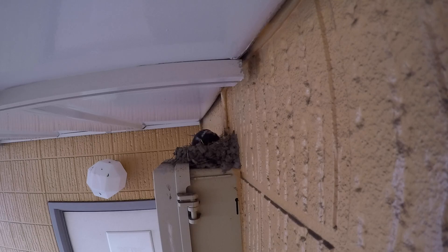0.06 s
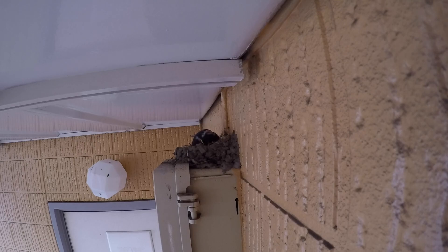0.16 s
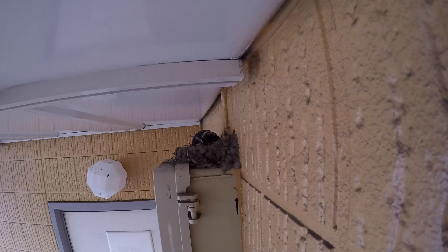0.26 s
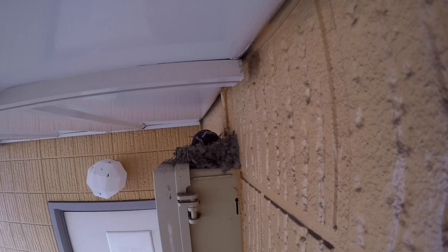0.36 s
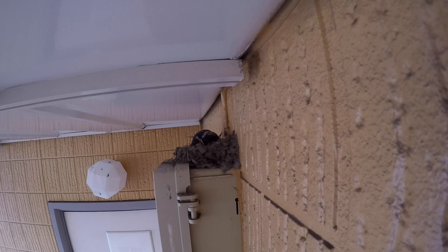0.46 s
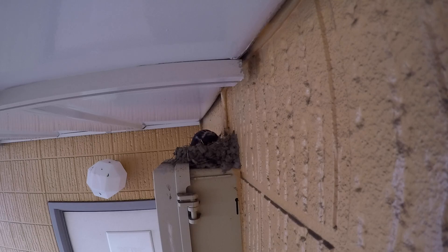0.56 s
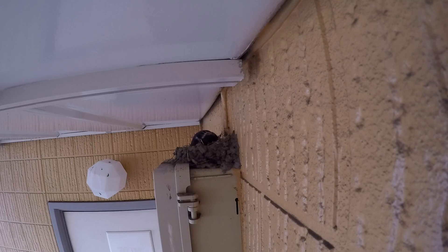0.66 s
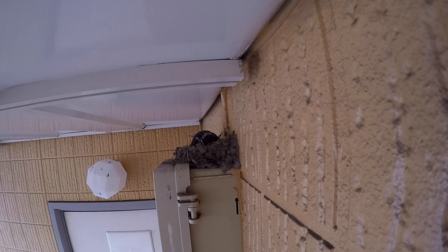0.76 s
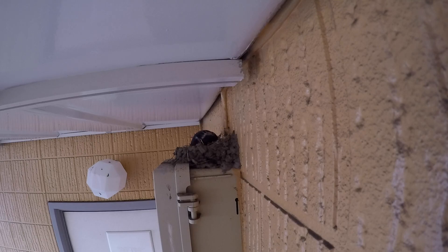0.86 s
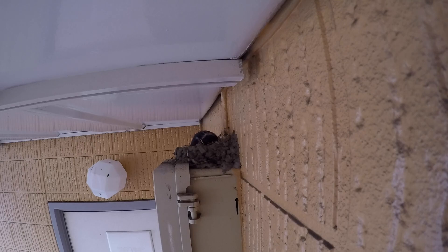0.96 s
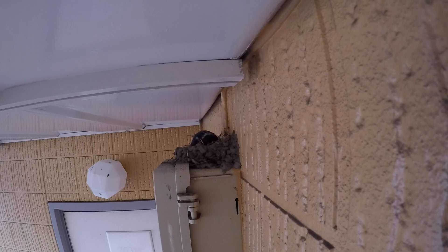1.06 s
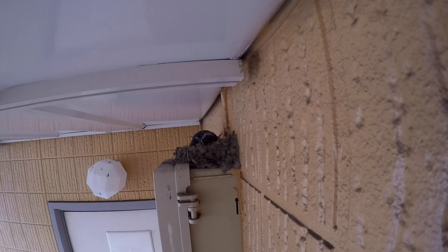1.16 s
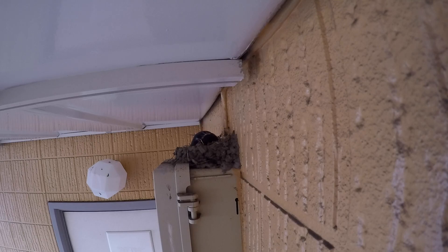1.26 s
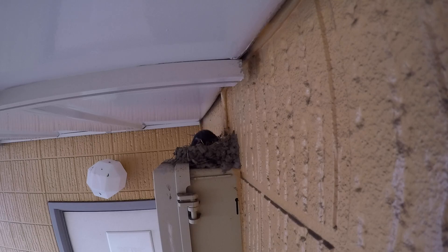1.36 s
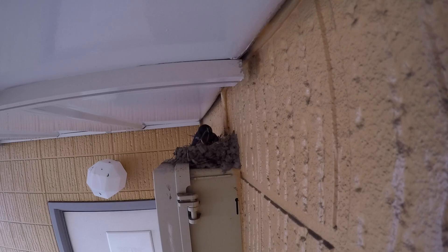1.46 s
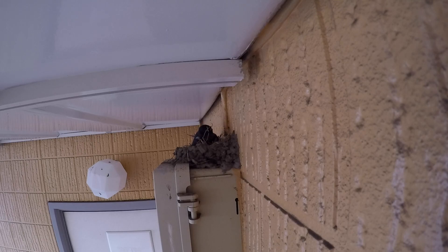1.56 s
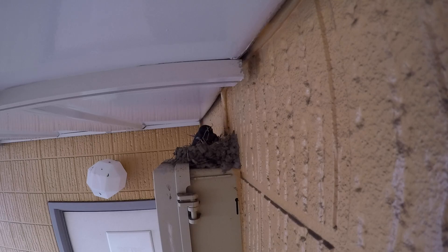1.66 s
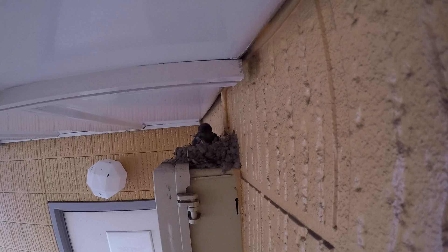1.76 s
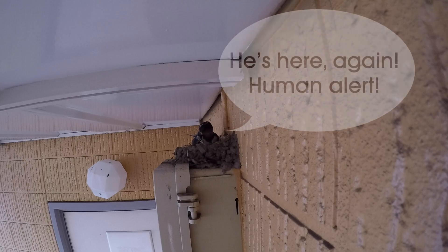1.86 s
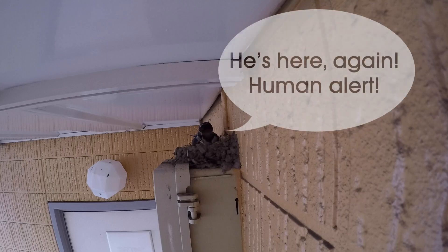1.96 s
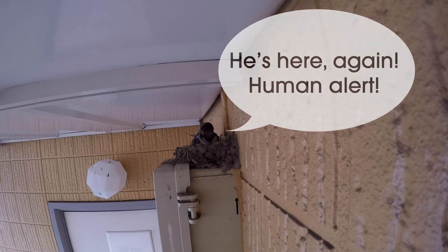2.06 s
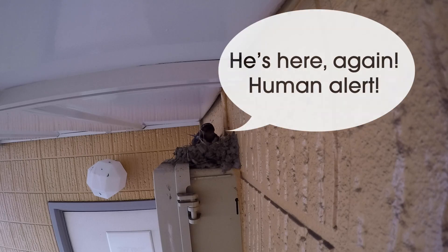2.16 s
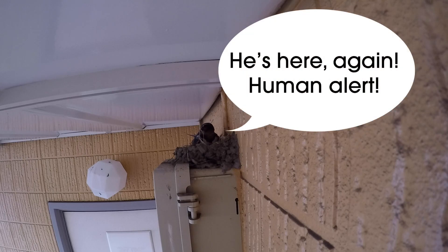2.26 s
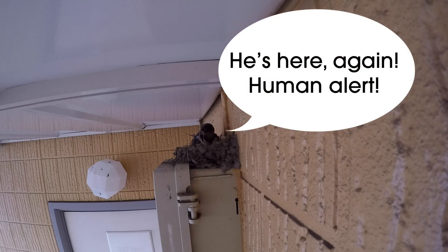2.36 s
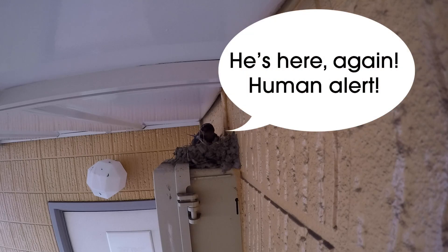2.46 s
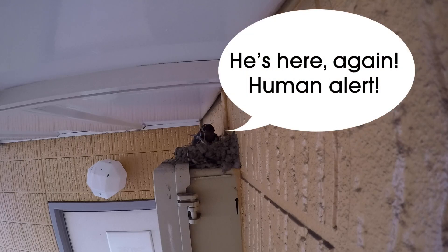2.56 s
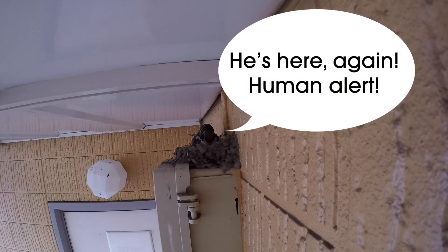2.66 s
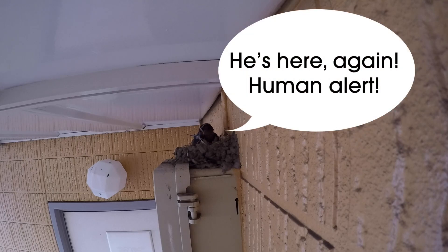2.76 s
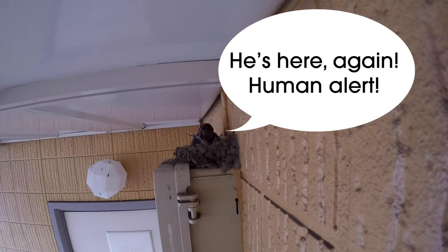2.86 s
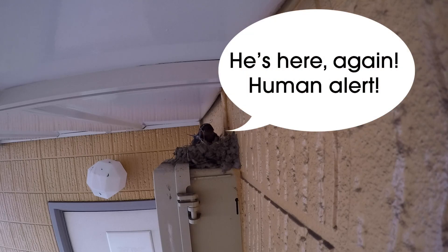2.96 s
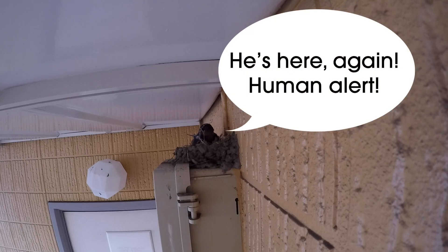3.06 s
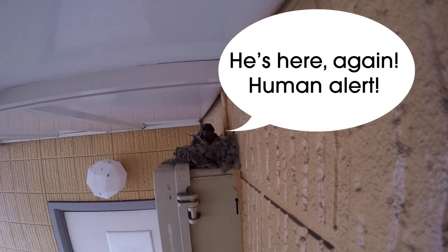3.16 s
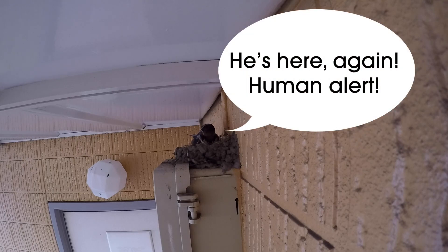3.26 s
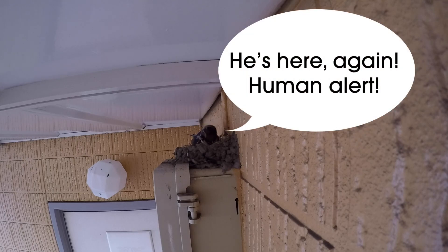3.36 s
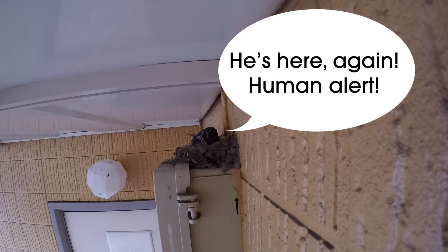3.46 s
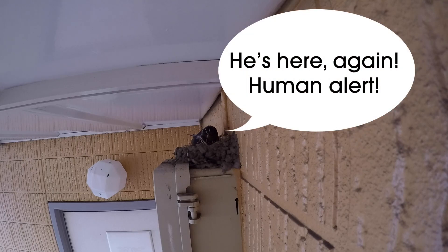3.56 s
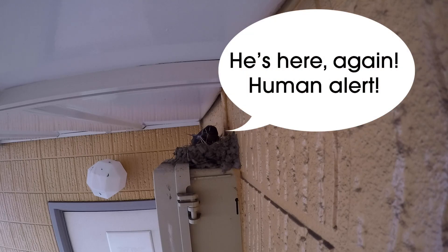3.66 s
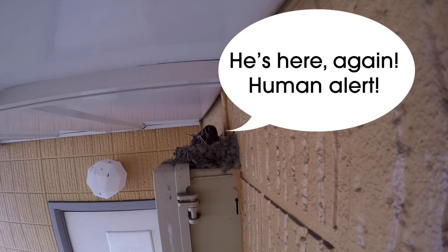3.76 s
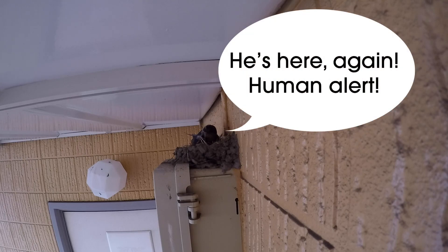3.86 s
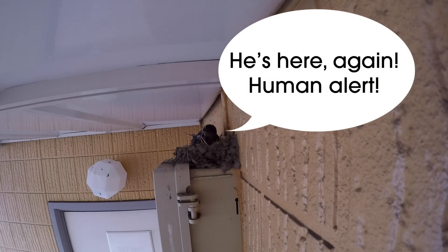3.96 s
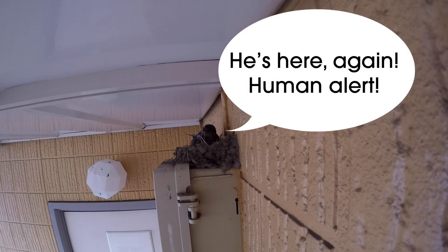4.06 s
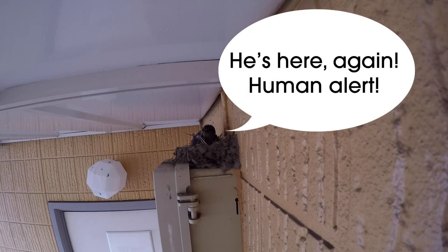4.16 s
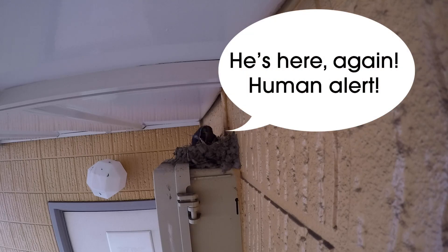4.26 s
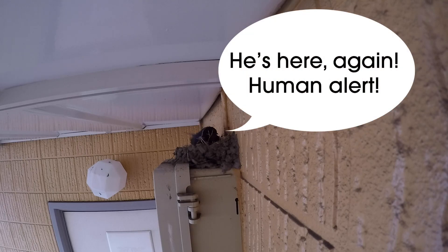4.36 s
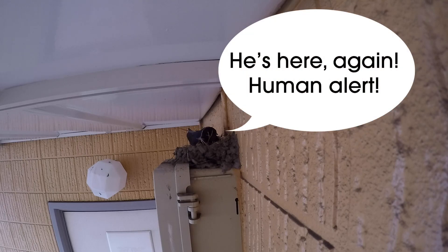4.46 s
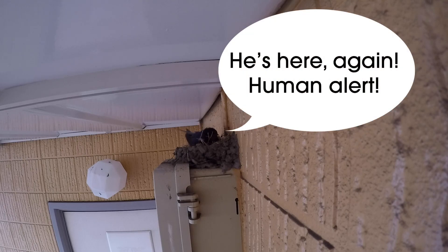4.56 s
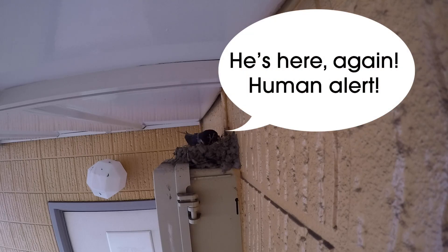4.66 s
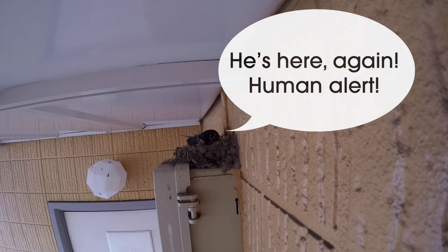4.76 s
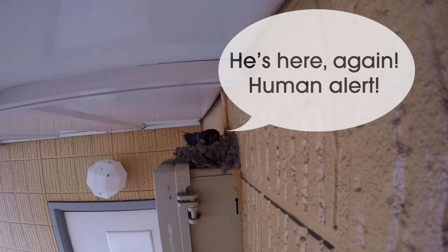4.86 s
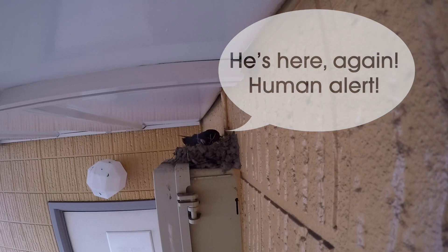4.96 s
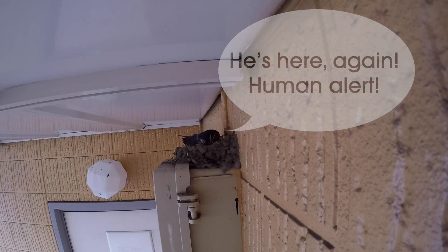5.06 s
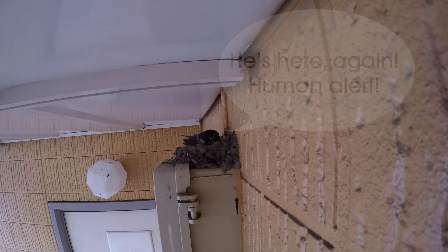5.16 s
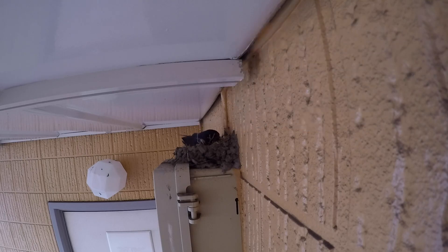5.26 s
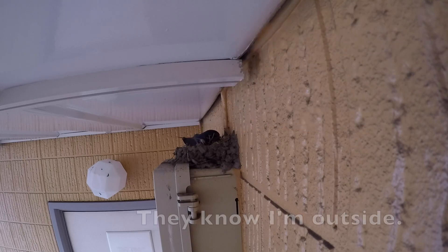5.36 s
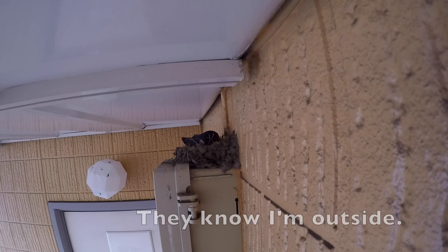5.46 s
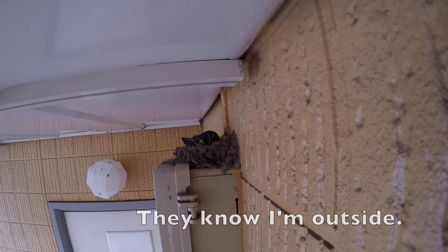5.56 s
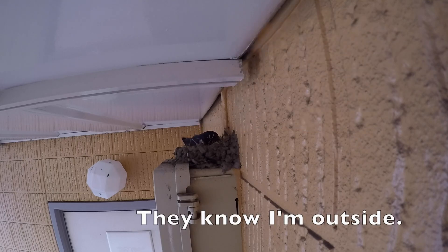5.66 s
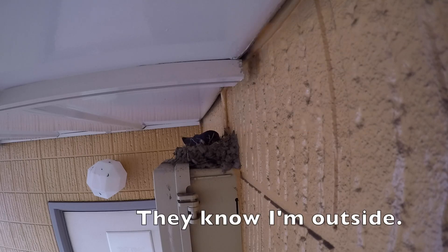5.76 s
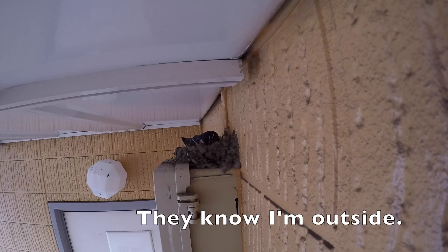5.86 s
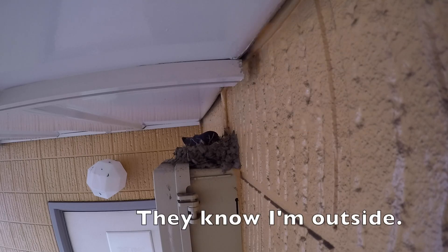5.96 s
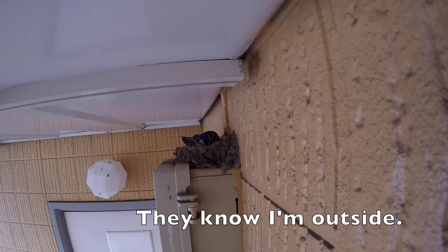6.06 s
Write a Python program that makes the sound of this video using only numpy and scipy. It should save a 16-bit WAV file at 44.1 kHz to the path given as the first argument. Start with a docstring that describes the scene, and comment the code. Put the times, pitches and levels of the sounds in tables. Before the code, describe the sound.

A swallow scolds from its porch nest with three rising chirps, then three quick phrases of tick, whistle, rasp and squeal over faint outdoor hush.

```python
"""Under a porch roof a barn swallow scolds from its nest: three rising chirps, then three phrases of
tick, whistle, rasp and two-voiced squeal, with two small beak clicks. The two sides of its syrinx are
phase oscillators that sound alone or modulate each other; one throat filter shapes every note.
The porch answers with brief echoes. Behind lie steady air, a low rumble, a distant rush and one soft
bump, all of coloured noise, and a thin high whine made of a pulsing sine."""
import sys
import numpy as np
from scipy import signal
from scipy.fft import rfft, irfft, next_fast_len
from scipy.io import wavfile
from scipy.ndimage import uniform_filter1d, map_coordinates

SR = 44100
rng = np.random.default_rng(int(sys.argv[2]) if len(sys.argv) > 2 else 0)


def file_out(sig):
    """Save sig as 16-bit WAV at sys.argv[1]."""
    # one column per channel
    cols = np.atleast_2d(sig).T
    # limit, then scale
    lim = np.clip(cols, -1, 1)
    pcm = np.round(lim * 32767).astype(np.int16)
    wavfile.write(sys.argv[1], SR, pcm)


N = 269671
TIME = np.arange(N) / SR  # seconds


def amp(db):
    """Decibels to gain."""
    return 10 ** (np.asarray(db) / 20)


def unit(x):
    """Scale to rms 1."""
    return x / np.sqrt(np.mean(x ** 2) + 1e-20)


def along(points, hz):
    """Read (Hz, value) points on a log frequency axis."""
    point_hz, values = np.transpose(points)
    return np.interp(np.log(hz + 1), np.log(point_hz + 1), values)


def curves(rows, at):
    """Read each column after the first at the given values of the first."""
    first, *columns = np.transpose(rows)
    return [np.interp(at, first, column) for column in columns]


def wobble(rate, n):
    """A smooth random curve of n samples, a spline through rate random knots a second."""
    return map_coordinates(rng.standard_normal(int(n * rate / SR) + 4), [np.arange(n) * rate / SR])


def filtered(x, response):
    """Multiply the spectrum of x by a response of frequency."""
    m = next_fast_len(N + SR // 2)  # padded so that the end does not wrap onto the start
    return irfft(rfft(x, m) * response(np.fft.rfftfreq(m, 1 / SR)), m)[:N]


def noise(spectrum):
    """White noise coloured by a (Hz, dB) spectrum, scaled to rms 1."""
    return unit(filtered(rng.standard_normal(N), lambda hz: amp(along(spectrum, hz))))


def steady_air(level_db=-63.5):
    """The even hush of the place, noise that thins towards the treble."""
    # Colour of the air: frequency_hz, relative_level_db (per Hz)
    air_colour = [(30, -9.5), (100, -5.5), (200, -7.5), (300, -13.5), (450, -15.5), (1000, -18),
                  (2500, -20), (6000, -24), (10000, -29.5), (15000, -32.5)]
    return amp(level_db) * noise(air_colour)


def low_rumble():
    """Deep outdoor noise, strongest around 40 Hz, that rises and sinks."""
    # Colour of the rumble: frequency_hz, relative_level_db (per Hz)
    rumble_colour = [(10, -14.5), (25, -4.5), (39, 1), (48, -11), (65, -8.5), (85, -13.5), (120, -20.5),
                     (160, -30), (300, -37.5), (600, -92)]
    # Strength of the rumble through time: time_s, level_db
    rumble_level = [(0.0, -58.5), (0.45, -53), (1.41, -56.5), (2.17, -49), (3.44, -58.5), (5.04, -59),
                    (6.05, -56.5)]
    return amp(curves(rumble_level, TIME)[0]) * noise(rumble_colour)


def distant_rush():
    """Noise from far off that swells early, then dies away, with a slight unsteadiness."""
    # Colour of the rush: frequency_hz, relative_level_db (per Hz)
    rush_colour = [(70, -3), (115, 6.5), (170, -2), (270, 3.5), (450, -6.5), (800, 0.5), (1900, -0.5),
                   (3000, -8.5), (6000, -37), (12000, -39)]
    # Strength of the rush through time: time_s, level_db
    rush_level = [(0, -68.5), (.7, -67.5), (.85, -62), (1.3, -63.5), (2, -65.5), (2.7, -66.5), (3.5, -76.5),
                  (6.1, -84)]
    level_db = curves(rush_level, TIME)[0] + 0.36 * wobble(9.1, N)
    return amp(level_db) * noise(rush_colour)


def soft_bump():
    """One low thud, a burst of dark noise under a bell-shaped envelope."""
    # The bump: centre_s, half_width_s, level_db
    centre, half_width, level_db = (2.21, 0.057, -56.5)
    envelope = np.exp(-((TIME - centre) / half_width) ** 2)
    return amp(level_db) * envelope * noise([(30, -11), (80, 1.5), (210, 2), (330, -24), (1000, -70)])


def outdoors():
    """The outdoor background: air, rumble, rush and bump."""
    return steady_air() + low_rumble() + distant_rush() + soft_bump()


def whine(whine_hz=8484, whine_db=-84, pulse_hz=30):
    """A thin electronic whine, a sine of slightly unsteady pitch that pulses 30 times a second."""
    pulses = 1 + np.sin(2 * np.pi * pulse_hz * TIME)
    phase = 2 * np.pi * np.cumsum(whine_hz + 50 * wobble(600, N)) / SR
    return amp(whine_db) * pulses * np.sin(phase)


def porch(x, walls_db=-12, tail_db=-15):
    """Weak echoes from the near walls and ceiling, with a diffuse tail whose treble dies sooner."""
    # Decay of the tail under the roof: frequency_hz, t60_s
    porch_decay = [(1000, 0.45), (3000, 0.56), (5000, 0.38), (12000, 0.13)]
    hz, t, spectra = signal.stft(rng.standard_normal(SR * 3 // 4), SR, nperseg=256)
    decay_db = -60 * t / along(porch_decay, hz)[:, None]
    tail = signal.istft(spectra * amp(decay_db), SR, nperseg=256)[1]
    walls = np.zeros(len(tail))
    walls[rng.integers(40, 800, size=10)] = rng.standard_normal(size=10)  # 1 to 18 ms late
    answer = amp(walls_db) * walls / np.linalg.norm(walls) + amp(tail_db) * tail / np.linalg.norm(tail)
    return signal.fftconvolve(x, answer)[:N]


def gesture(shape, times):
    """Lay a note's shape over its landmark times; its controls are rounded by muscle inertia."""
    t = TIME[round(times[0] * SR):round(times[-1] * SR)]
    progress = np.interp(t, times, np.arange(len(times)))  # 0, 1, 2, .. at the landmarks
    controls = [uniform_filter1d(c, size=110, mode="nearest") for c in curves(shape, progress)]
    return t, progress, controls


def add(out, t, note):
    """Mix a note in at its time, with soft ends."""
    ends = signal.windows.tukey(len(t), min(1, 160 / len(t)))
    out[round(t[0] * SR):][:len(t)] += note * ends


def membrane(hz, rough, jitter_hz=520, jitter_rate=1500, waver=0.0065):
    """Phase of one vibrating side of the syrinx; roughness scatters its cycles."""
    n = len(hz)
    wavering_hz = hz * (1 + waver * wobble(248.0, n))
    jitter = jitter_hz * rough * wobble(jitter_rate, n)
    return 2 * np.pi * np.cumsum(wavering_hz + jitter) / SR


def voiced(tone, rough, rasp_db, crackle_db=7, crackle_rate=700, quiver_db=2.04):
    """Roughness adds noise that follows the tone's strength and uneven bursts; a quiver is always there."""
    n = len(tone)
    strength = np.sqrt(np.abs(uniform_filter1d(tone ** 2, size=90)))
    crackle = crackle_db * rough * (wobble(crackle_rate, n) - .5)
    bursts = amp(crackle + quiver_db * wobble(163, n))
    flutter = amp(rasp_db) * rough * strength * rng.standard_normal(n)
    return bursts * (tone + flutter)


def one_voice(hz, db, rough, harmonics_db, rasp_db):
    """One membrane sounds alone with its harmonics."""
    phase = membrane(hz, rough)
    tone = 0
    for k, harmonic_db in enumerate(harmonics_db, 1):
        audible = k * hz < SR / 2  # silent above half the sample rate
        tone = tone + amp(db + harmonic_db) * np.sin(k * phase) * audible
    return voiced(np.sqrt(2) * tone, rough, rasp_db)


def two_voices(low_hz, high_hz, low_db, high_db, rough, partials, rasp_db, overtones_db=0):
    """Both membranes share one airstream, which makes sum and difference tones."""
    low, high = membrane(low_hz, rough), membrane(high_hz, rough)
    tone = 0
    for m, n, db in partials:
        m, n = round(m), round(n)
        order = max(1, abs(m) + abs(n))
        level_db = (abs(m) * low_db + abs(n) * high_db) / order + overtones_db * (order > 1)
        tone = tone + amp(level_db + db) * np.sin(m * low + n * high)
    return voiced(np.sqrt(2) * tone, rough, rasp_db)


def chirp(times, low_pitch, high_pitch, gain_db):
    """Two upward sweeps, each voice at its own pitch."""
    # Both voices sweep up, before pitch factors, gain and throat:
    # progress, low_hz, high_hz, low_db, high_db, roughness (0-1)
    chirp_shape = [(0, 1950, 2650, -57, -49, .3), (.35, 2000, 2780, -43, -48, .25),
                   (.72, 2200, 3250, -41, -42.5, .27), (1, 2800, 4100, -39, -42, .12),
                   (1.6, 4030, 4450, -40.5, -45, 0.14), (2, 3750, 4450, -50, -54.5, 0)]
    # Partials: multiple_of_low, multiple_of_high, relative_level_db
    chirp_partials = [(1, 0, 0), (0, 1, 0), (2, 0, -21), (1, 1, -17), (0, 2, -25)]
    t, _, (low_hz, high_hz, *effort) = gesture(chirp_shape, times)
    voices = two_voices(low_pitch * low_hz, high_pitch * high_hz, *effort, chirp_partials, rasp_db=3.5)
    return t, amp(gain_db) * voices


def tick(times, lift_hz, low_gain_db, high_gain_db, overtones_db, dip_width=0.605):
    """A dip of varying depth, then a sharp accent; the overtones come out after the crest."""
    # The high voice dips and the low one breaks in as it recovers, before lift, gains and throat:
    # progress, low_hz, high_hz, low_db, high_db, roughness (0-1)
    tick_shape = [(0, 2030, 4620, -75, -49, .08), (.35, 1990, 4490, -60, -46.5, .14),
                  (.75, 1900, 3600, -53, -49, 0.38), (1.3, 1950, 3600, -49, -47.5, .33),
                  (1.7, 3270, 4730, -46, -39.5, .1), (2, 3900, 4970, -30.5, -43.5, .05),
                  (2.25, 3703, 5070, -32.5, -39, 0.22), (2.55, 3000, 5030, -39.5, -49, 0.3),
                  (2.8, 3310, 5040, -41, -55, 0.38), (3, 3140, 5060, -51, -64, 0.32)]
    # Partials: multiple_of_low, multiple_of_high, relative_level_db
    tick_partials = [(1, 0, 0), (0, 1, 0), (2, 0, -8), (0, 2, -16), (3, 0, -17)]
    t, progress, (low_hz, high_hz, low_db, high_db, rough) = gesture(tick_shape, times)
    high_hz = high_hz + lift_hz * np.exp(-((progress - 1) / dip_width) ** 2)
    strain = np.interp(progress, [2, 2.5], [0, 1])
    return t, two_voices(low_hz, high_hz, low_db + low_gain_db, high_db + high_gain_db, rough,
                         tick_partials, rasp_db=4.5, overtones_db=strain * overtones_db)


def beak_click(start, end, db, pitch_hz=4300):
    """A small noisy click of the beak, a scattered sine under strong noise."""
    t = TIME[round(start * SR):round(end * SR)]
    phase = membrane(np.full(len(t), pitch_hz), 0.96)
    return t, amp(db) * voiced(np.sin(phase), 1, rasp_db=5.5)


def whistle(times, pitch, foot_pitch, gain_db, clean=.028, torn=0.23, opening_overtones_db=-13):
    """One voice opens almost pure, drops, flicks upward twice, torn while it does, and clears for the arch."""
    # Drop, zigzag and arch, before flicks, pitch factors, gain and throat: progress, pitch_hz, level_db
    whistle_shape = [(0, 4720, -44), (.55, 4480, -29), (1, 2320, -44), (1.5, 1850, -44.5), (2, 1740, -41.5),
                     (2.1, 2030, -42), (2.33, 2050, -44), (2.6, 2280, -35.5), (2.76, 2420, -45),
                     (2.92, 2474, -33), (3.15, 2524, -32), (3.55, 2365, -33.5), (4, 1850, -45.5)]
    # Harmonics 1, 2, ..: relative_level_db
    whistle_harmonics = [-3, 0.5, -10.5, -11.5, -10.5]
    flick_hz, flick_db = 1166, 7.5  # height and boost of each flick
    t, progress, (hz, db) = gesture(whistle_shape, times)
    hz = hz * np.interp(progress, [1, 2, 3], [pitch, foot_pitch, pitch])
    flick = np.sin(2 * np.pi * np.clip(progress, 1, 2)) ** 2
    rough = np.interp(progress, [.6, .9, 2.05, 2.15], [clean, torn, torn, clean])
    overtones_db = np.interp(progress, [.55, .8], [opening_overtones_db, 0])
    harmonics_db = [h + overtones_db * (k > 0) for k, h in enumerate(whistle_harmonics)]
    return t, one_voice(hz + flick_hz * flick, db + gain_db + flick_db * flick, rough, harmonics_db, rasp_db=1)


def rasp(times, pitch, gain_db, trill_hz=68, swing=0.17, throb_db=2.0, second_hz=1850, second_db=-5):
    """A low rough voice trills in pitch and strength; the other membrane rattles a little above it."""
    # The low trilling voice, before trill, pitch factor, gain and throat:
    # progress, pitch_hz, level_db, trill_depth (0-1), roughness (0-1)
    rasp_shape = [(0, 1300, -57, 0.13, 0.58), (.25, 1320, -44, 0.37, 0.41), (.55, 1310, -41.5, 0.59, .32),
                  (1, 1330, -38, 0.9, .17), (1.35, 1322, -38, 0.91, .18), (1.55, 1210, -44, .42, 0.17),
                  (1.8, 1140, -44, 0.32, 0.16), (2, 1234, -44.5, 0.8, 0.15)]
    # Harmonics 1, 2, ..: relative_level_db
    rasp_harmonics = [-2.5, -4, 1, -5.5, -11.5, -17, -15, -9.5, -11]
    t, _, (hz, db, depth, rough) = gesture(rasp_shape, times)
    trill = depth * np.cos(2 * np.pi * trill_hz * (t - times[1]))
    bend = 1 + swing * trill
    db = db + gain_db + throb_db * trill
    second = amp(db + second_db) * np.sin(membrane(second_hz * bend, rough))
    first = one_voice(pitch * hz * bend, db, rough, rasp_harmonics, rasp_db=-1)
    return t, first + second


def squeal(times, pitch, gain_db, overtones_db):
    """Both voices rise out of the rasp and fall together, thick with combination tones."""
    # Both voices arch together, before pitch factor, gains and throat:
    # progress, low_hz, high_hz, low_db, high_db, roughness (0-1), overtones_db
    squeal_shape = [(0, 1666, 2487, -46, -43, 0.38, -2), (.4, 1760, 2780, -41.5, -37.5, .27, -6),
                    (.7, 1926, 3270, -45.5, -34, .19, -2), (1, 2151, 3583, -37, -30.5, 0.2, -0.5),
                    (1.45, 2125, 3305, -34, -33, 0.16, 3), (2, 1700, 2880, -35, -33.5, .22, 0.5),
                    (2.4, 1682, 2953, -45.5, -40, 0.24, 2.5), (3, 1795, 2784, -53, -38, 0.16, -4)]
    # Partials: multiple_of_low, multiple_of_high, relative_level_db
    squeal_partials = [(1, 0, -3), (0, 1, -1), (2, 0, -8), (1, 1, -3.5), (0, 2, -11), (2, 1, -11),
                       (-1, 1, -21), (3, 0, -18), (0, 3, -13)]
    t, _, (low_hz, high_hz, low_db, high_db, rough, bright_db) = gesture(squeal_shape, times)
    voices = two_voices(pitch * low_hz, pitch * high_hz, low_db, high_db, rough, squeal_partials,
                        rasp_db=0.0, overtones_db=bright_db + overtones_db)
    return t, amp(gain_db) * voices


def swallow():
    """The whole scolding, every sound shaped by the same throat filter."""
    # Rising chirps: start_s, turn_s, end_s, low_pitch_factor, high_pitch_factor, gain_db
    chirps = [(1.990, 2.046, 2.064, 1.03, 1.1, -4.5), (2.209, 2.268, 2.297, 1.0, 1.006, -1),
              (2.454, 2.511, 2.537, 1.0, .97, 0)]
    # Ticks: start_s, dip_s, crest_s, end_s, dip_lift_hz, low_gain_db, high_gain_db, overtones_db
    ticks = [(2.675, 2.695, 2.729, 2.757, -280, 1.5, -2, 9.5),
             (3.471, 3.505, 3.529, 3.556, 219, -3.5, 4, 20),
             (4.539, 4.563, 4.591, 4.611, -32, -2, -2.5, 12.5)]
    # Beak clicks around the onset of a whistle: start_s, end_s, level_db (before noise and throat)
    beak_clicks = [(3.608, 3.621, -49), (4.66, 4.683, -50.5)]
    # Whistles: start_s, zigzag_start_s, arch_start_s, crest_s, end_s,
    # pitch_factor, pitch_factor_at_foot_of_arch, gain_db
    whistles = [(2.821, 2.839, 2.867, 2.953, 2.977, 1.02, 1.02, 1),
                (3.620, 3.636, 3.665, 3.748, 3.778, .995, 1.0, .5),
                (4.668, 4.686, 4.717, 4.800, 4.826, .99, .91, -.5)]
    # Rasps: start_s, loudest_s, end_s, pitch_factor, gain_db
    rasps = [(3.04, 3.074, 3.135, 0.99, 1), (3.838, 3.879, 3.953, 1.0, 2.5),
             (4.894, 4.927, 4.997, 0.97, -.5)]
    # Squeals: start_s, crest_s, foot_of_fall_s, end_s, pitch_factor, gain_db, overtones_db
    squeals = [(3.128, 3.180, 3.229, 3.241, 1.0, 0, 0), (3.945, 3.996, 4.042, 4.098, 1.0, .3, 1),
               (4.992, 5.044, 5.088, 5.101, .985, -.5, -3)]
    # Response of windpipe and open beak: frequency_hz, gain_db
    throat = [(500, -50), (1000, -30.5), (1400, -12), (1950, -8), (2450, -11), (3000, -5.5), (3500, -1.5),
              (4000, -1.14), (5000, -4), (5700, -13), (6900, -13.5), (7600, -23.5), (8400, -43),
              (9400, -27.5), (10700, -26), (12500, -28), (15000, -42.5)]
    song = np.zeros(N)
    for *times, low_pitch, high_pitch, gain_db in chirps:
        add(song, *chirp(times, low_pitch, high_pitch, gain_db))
    for *times, lift_hz, low_db, high_db, overtones_db in ticks:
        add(song, *tick(times, lift_hz, low_db, high_db, overtones_db))
    for start, end, db in beak_clicks:
        add(song, *beak_click(start, end, db))
    for *times, pitch, foot_pitch, gain_db in whistles:
        add(song, *whistle(times, pitch, foot_pitch, gain_db))
    for *times, pitch, gain_db in rasps:
        add(song, *rasp(times, pitch, gain_db))
    for *times, pitch, gain_db, overtones_db in squeals:
        add(song, *squeal(times, pitch, gain_db, overtones_db))
    return filtered(song, lambda hz: amp(along(throat, hz)))


def scene():
    """The outdoor background, the whine, the porch and the bird, as one channel."""
    background = outdoors() + whine()
    bird = swallow()
    return (background + porch(bird) + bird)[None]


def record(dry, top_hz=15250):
    """The microphone channel keeps nothing at or above its band limit."""
    return np.array([filtered(x, lambda hz: hz < top_hz) for x in dry])


dry = scene()
out = record(dry)
file_out(out)
```